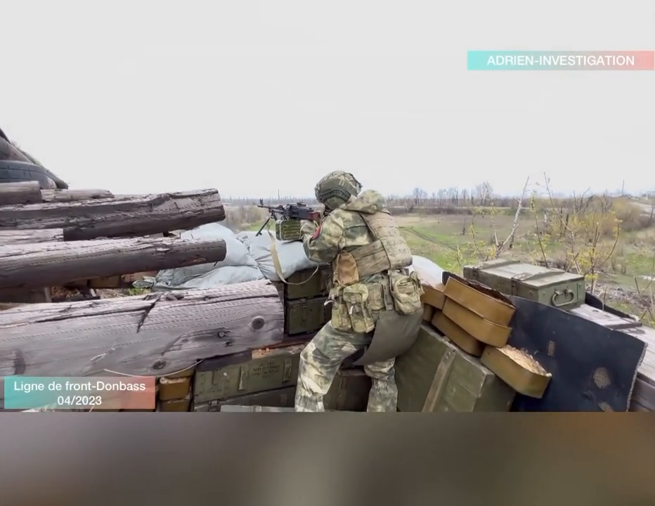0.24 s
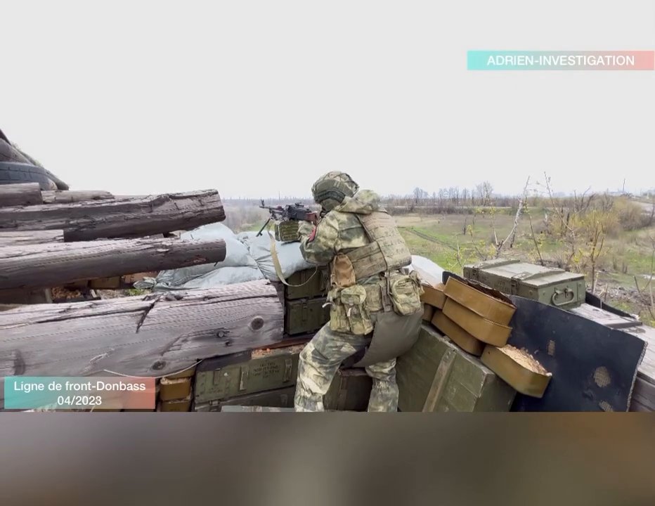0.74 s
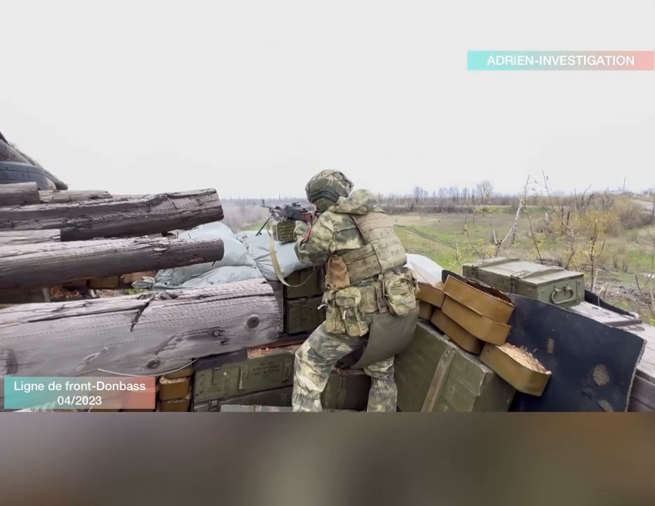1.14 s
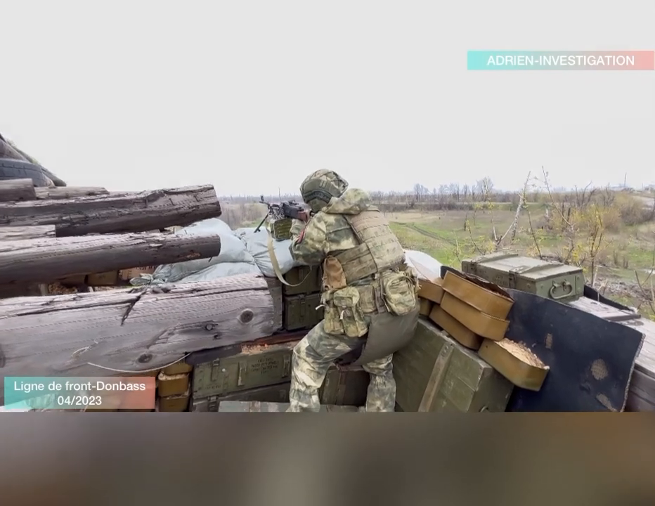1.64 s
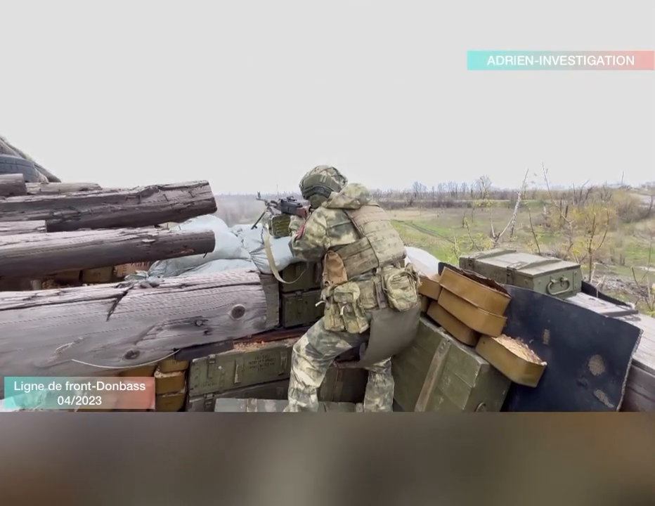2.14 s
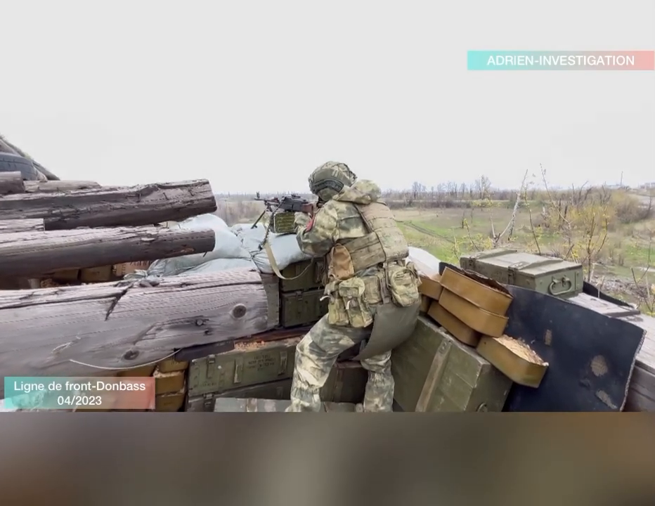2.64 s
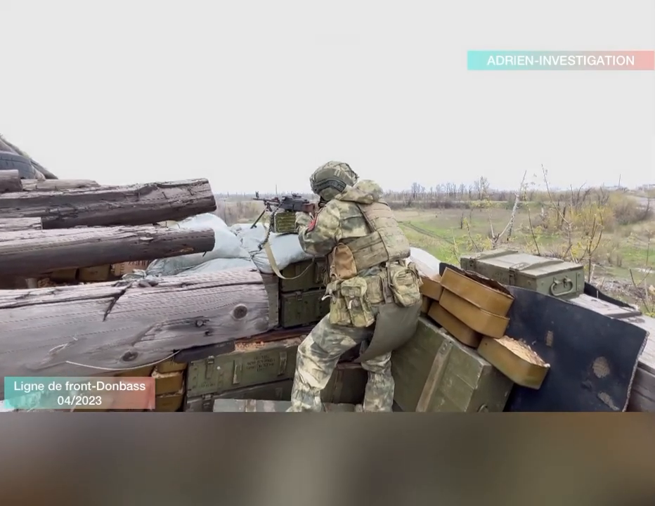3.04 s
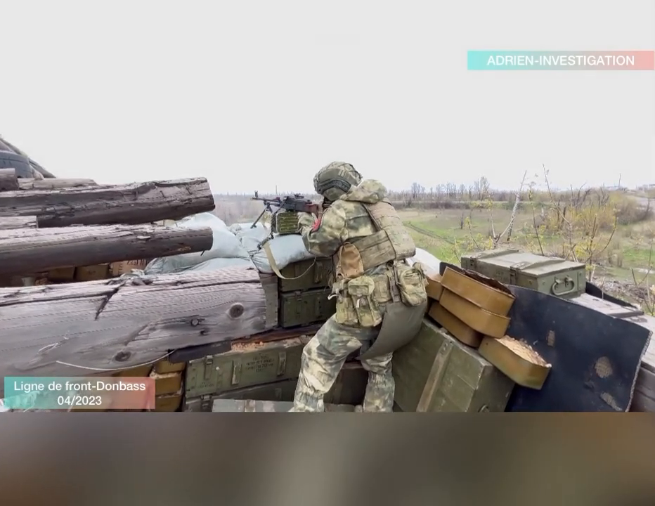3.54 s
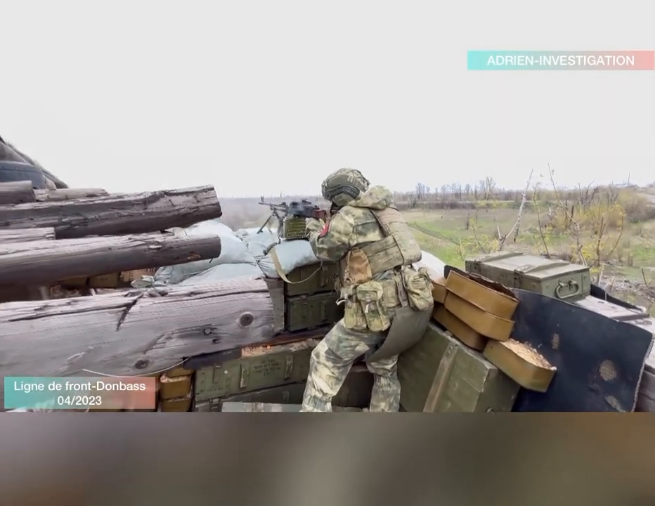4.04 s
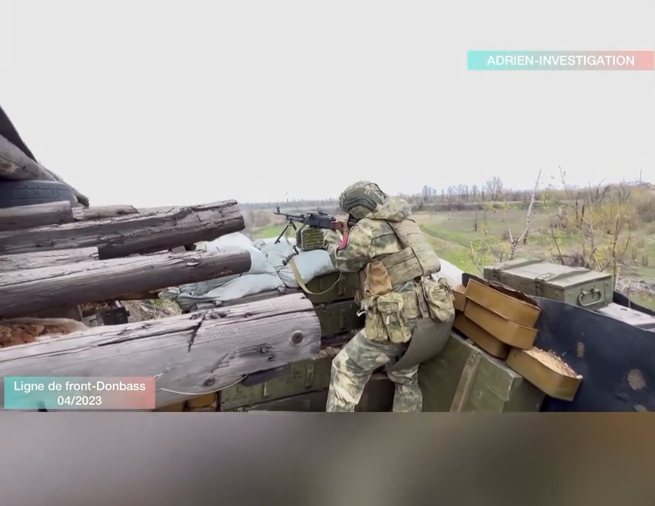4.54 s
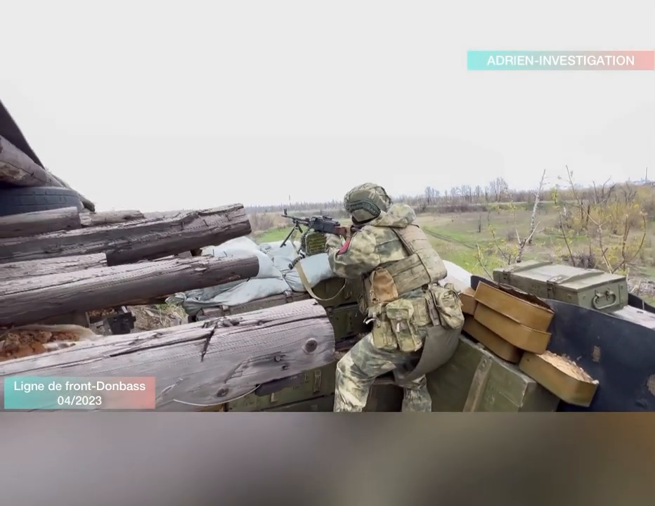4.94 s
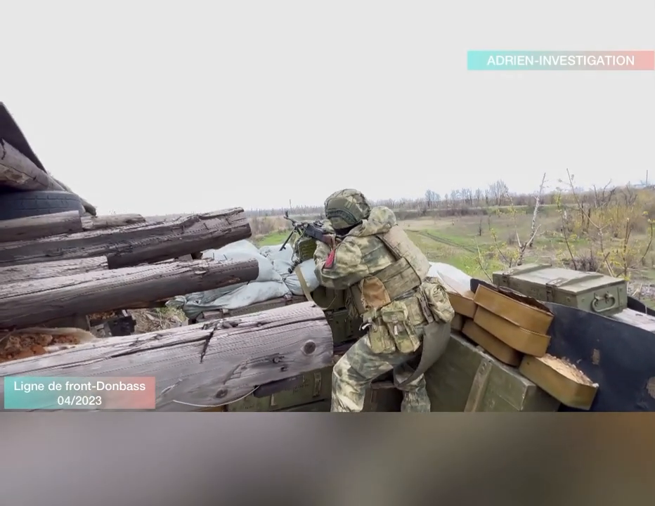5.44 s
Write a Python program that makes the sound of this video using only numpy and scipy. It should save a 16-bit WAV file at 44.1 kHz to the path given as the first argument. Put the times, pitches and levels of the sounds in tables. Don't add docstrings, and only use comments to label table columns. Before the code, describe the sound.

Close outdoor stereo capture of a belt-fed machine gun in a log-and-crate trench, weighted left. A faint tail from earlier fire, wind thumps and small pops open the scene, then bolt clicks and a brief scrape lead into three rounds at 0.3-0.5 s. Two follow at 1.0-1.1, three at 1.8-2.0, three at 3.15-3.3 after the longest pause, and three at 3.95-4.1. Rounds are roughly 0.08 s apart: a bright, dry gas crack, a woody midrange bark, a pressure blast with tight reflections, and a low wall thud. After each burst a metallic catch clicks about 0.07-0.1 s later; loose links tick, and the belt drags briefly near 2.2. Echo rolls over fields as a long hiss, with a faint ridge reply nearly a second later. Gusts and dull pops buffet the microphone, strongest around 2.5-3.1 and 3.55. From 4.3 to the end, echoes fade into soft wind, airy hiss and tiny ticks.

```python
import sys
import numpy as np
from scipy import signal
from scipy.fft import rfft, irfft, next_fast_len
from scipy.io import wavfile
from scipy.ndimage import uniform_filter1d

SR = 44100
rng = np.random.default_rng(int(sys.argv[2]) if len(sys.argv) > 2 else 0)


def level_to_linear(level):
    exponent = np.asarray(level, float) / 20
    return 10 ** exponent


def transcribe(signal):
    frames = np.atleast_2d(signal).T
    limited = np.clip(frames, -1, 1)
    pcm = np.round(limited * 32767).astype(np.int16)
    wavfile.write(sys.argv[1], SR, pcm)


N = 250487
LEAD_S = 0.014
SLOW_S = np.arange(0, N / SR + .002, .002)

# (time [s], crack peak [dB], blast above it [dB], bark above it [dB], left minus right [dB])
ROUNDS = [(0.3215, -11, -11, -12.5, 10.5), (0.4086, -11, -8.5, -8, 9.0), (0.4928, -11.5, -9, -8.5, 11),
          (1.005, -11, -9.5, -7.5, 11), (1.0902, -11, -10.5, -5.5, 7.5), (1.7942, -9.5, -11.5, -10.5, 10),
          (1.8784, -9.5, -11.5, -8, 9.5), (1.9601, -10.5, -11, -7.5, 10), (3.1461, -9, -12, -5, 9),
          (3.2277, -9.5, -10.5, -7, 8.5), (3.3132, -9.5, -10.5, -8, 9.5), (3.9545, -10.5, -11, -19, 11),
          (4.04, -9, -11.5, -3, 8), (4.1234, -10, -9.5, -10, 10)]
# (frequency [Hz], level [dB per Hz])
CRACK = [(1120, -29), (1900, -4), (2800, -8), (5180, -10), (5670, -10), (7580, -11), (8520, -5.5),
         (9940, -15), (11600, -23), (13900, -20), (15600, -36.5), (16500, -46)]
# (frequency [Hz], level [dB per Hz])
BARK = [(350, -36.5), (620, 3.5), (900, -16), (1100, 3.5), (1330, -14), (1600, -7), (1900, -14),
        (2200, -11), (2700, -13), (3500, -26.5)]
# (frequency [Hz], level [dB per Hz])
WASH = [(35, -37), (60, -2), (246, -3), (573, -11), (1470, -16), (1730, -11), (2460, -21.5), (8540, -24.5),
        (11300, -34), (14300, -27), (16500, -69)]


def rounds():
    out = np.zeros((2, N))
    trench = pair(6144, CRACK, 0.15), pair(6144, BARK, 0.96), pair(6144, WASH, 0.04)
    for time, db, blast_db, bark_db, pan_db in ROUNDS:
        add(out, shot(blast_db, bark_db, trench), time - LEAD_S, db, pan_db - 7.0)
    return out


# (frequency [Hz], left minus right [dB])
NEAR_PORT = [(60, 7), (110, 1.5), (200, -3), (380, 8.5), (700, 9), (1290, 0), (2380, 2), (4400, 8),
             (8120, 7.5), (15000, -3)]
# (delay [s], level [dB])
NEAR_ECHOES = [(.002, -6), (.0038, -2), (.007, -5), (.0082, -6), (.0115, -3), (.013, -5), (.0151, 0),
               (.0178, -5), (.0203, -8), (.0217, -4), (.0269, -6), (.0303, -6), (.0351, -13), (.0403, -14),
               (.0435, -13)]
# (delay [s], level [dB])
FAR_ECHOES = [(.0049, -13), (.0093, -8), (.0107, -10), (.013, -12), (.0156, -12), (.0169, -11),
              (.0185, -10), (.0213, -12), (.0237, -14), (.0294, -16), (.0356, -18), (.0445, -18)]


def shot(blast_db, bark_db, trench):
    t = np.arange(6144) / SR - LEAD_S
    spurts = flicker(len(t), 1500, 2.5)[0]
    crack = again(trench[0], CRACK, .6, fresh=.6)
    bark = again(trench[1], BARK, .5, fresh=.5)
    wash = again(trench[2], WASH, .3, fresh=.4)

    lead_in = level_to_linear(-21.0) * fade(t + 0.011, 0.003, .3)
    lead_in = lead_in + level_to_linear(-11.0) * level_to_linear(60 * np.minimum(t, 0) / 0.0052)
    lead_in = lead_in * (t < 0)
    burst = np.minimum(fade(t, 0.00017, 0.051), .7) * 1.34
    crack = crack * (spurts * burst + lead_in)
    bark = bark * np.minimum(fade(t - .0006, 0.0006, 0.064), .5)

    early_wash = level_to_linear(-3.5) * (t < 0) * fade(t + 0.0067, 0.012, 0.1)
    late_slap = 1.4 * fade(t - .021, 0.0063, 0.034)
    wash = wash * (fade(t, .013, 0.19) + late_slap + early_wash)

    gas = crack * level_to_linear(-5.5) + bark * level_to_linear(bark_db + 1.0) + wash * level_to_linear(-9.5)
    left_shade = [(hz, db / 2) for hz, db in NEAR_PORT]
    right_shade = [(hz, -db / 2) for hz, db in NEAR_PORT]
    gas = np.array([colour(gas[0], left_shade), colour(gas[1], right_shade)])

    near = blast(t, NEAR_ECHOES, .00004, 1.2)
    far = blast(t, FAR_ECHOES, .0002, 2.5) * level_to_linear(3)
    return gas + (np.array([near, far]) + hollows(t)) * level_to_linear(blast_db + 14.5)


def again(kept, spectrum, alike, fresh):
    return np.sqrt(1 - fresh ** 2) * kept + fresh * pair(kept.shape[1], spectrum, alike)


def blast(t, echoes, scatter_s, scatter_db):
    delay, db = np.transpose(echoes)
    chance = rng.standard_normal((2, len(delay)))
    width = (0.00018 + 0.0078 * delay)[:, None]
    arrival = (delay + scatter_s * chance[1])[:, None]
    dips = -level_to_linear(db + scatter_db * chance[0]) @ np.exp(-((t - arrival) / width) ** 2)
    leak = signal.butter(1, 260, "highpass", fs=SR, output="sos")
    return signal.sosfilt(leak, dips)


# (frequency [Hz], level [dB], time to fall 60 dB [s], right minus left [dB])
HOLLOWS = [(88, -21, 0.23, -2), (261, -14.5, 0.16, -5.5), (466, -15, 0.043, -3.5), (598, -9, 0.029, -5.5),
           (740.3, -10.5, 0.067, 0.5), (1059, -12.5, .05, -4.5), (1114, -15, 0.12, -4.5),
           (1645, -3.5, 0.027, -9), (1710, -11.5, .025, -9), (2260, -4, 0.015, -12.5)]


def hollows(t):
    hz, db, t60, far_db = np.transpose(HOLLOWS)[:, :, None]
    chance = rng.standard_normal((3, *hz.shape))
    db = db + 3 * chance[0]
    hz = hz * (1 + .025 * chance[1])
    ports = (0, .001), (far_db, 0.002814 + .0008 * chance[2])  # (level [dB], delay [s])
    out = []
    for port_db, late in ports:
        ring = fade(t - late, 2.1 / hz, t60) * np.sin(2 * np.pi * hz * (t - late))
        out.append(np.sum(level_to_linear(db + port_db) * ring, axis=0))
    return np.array(out)


# (first round time [s], force on the trigger [dB], bolt caught again [s], catch peak [dB],
# recoil into the wall [dB])
BURSTS = [
    (0.3205, 0, 0.5504, -36, -3),
    (1.005, .5, 1.1696, -35, 0),
    (1.7949, -1.5, 2.0305, -38, 2),
    (3.1462, 1.5, 3.3785, -38, 0),
    (3.9553, 5, 4.19, -30.5, 0),
]


def thuds():
    out, t = np.zeros((2, N)), np.arange(8192) / SR
    times, db = np.transpose(ROUNDS)[:2]
    first = np.diff(times, prepend=-1) > .5
    recoil_db = np.transpose(BURSTS)[4][np.cumsum(first) - 1]
    db = db + 4 * first + recoil_db
    chance = rng.standard_normal((len(times), 3))
    for time, level, (bend, jolt, turn) in zip(times, db, chance):
        phase = 2 * np.pi * 138 * (1 + .03 * bend) * t + np.array([[0], [turn]])
        thud = fade(t, 0.03, 0.085) * np.sin(phase)
        add(out, thud, time + 0.009, level + 2 * jolt, 6)
    return out


EARLIER_S = (-.5, -.41)
# (frequency [Hz], level [dB per Hz])
ROLL = [(120, -39.5), (200, -12), (306, -10.5), (728, -13), (1200, -16), (1500, -20.5), (3630, -28),
        (5970, -23.5), (7590, -29.5), (8330, -24), (10400, -31), (11400, -38), (14000, -35.5),
        (16500, -62.5)]
# (frequency [Hz], time to fall 60 dB [s])
ROLL_T60 = [(250, 2.1), (1000, 1.4), (2500, 2.54), (5000, 1.3), (9000, 1), (14000, 0.7)]


def roll(times, db):
    t = np.arange(3 * SR) / SR
    spectrum = rfft(pair(len(t), ROLL, -0.28, lag=0))
    hz = np.arange(len(t) // 2 + 1) / 3
    octave = np.log2(np.maximum(hz, 1))
    tail = 0
    for mid in 125 * 2. ** np.arange(8):
        share = np.maximum(1 - np.abs(octave - np.log2(mid)), 0)
        tail = tail + irfft(spectrum * share, len(t)) * fade(t, 0.015, along(ROLL_T60, mid))
    tail = tail * flicker(len(t), 34, 0.94)
    hits = np.zeros((1, N + SR))
    hits[0, ((times + 1) * SR).astype(int)] = level_to_linear(db)
    return signal.fftconvolve(hits, tail, axes=1)[:, SR:SR + N]


# (frequency [Hz], level [dB per Hz])
RIDGE = [(300, -29), (900, -5.5), (1400, -6), (2100, -6), (3500, -22.5), (5500, -26), (9000, -44.5)]


def ridge(times):
    power = sum(fade(SLOW_S - time - 0.83, 0.13, 1.9) ** 2 for time in times)
    return pair(N, RIDGE, 0.079) * gain(power) * level_to_linear(-60)


# (frequency [Hz], level [dB per Hz])
CLICK = [(470, -29.5), (800, -5.5), (1580, -4.5), (2470, -12.5), (5550, -7.5), (9570, -8.5), (11400, -15.5),
         (15300, -13), (16500, -26)]
# (frequency [Hz], level [dB per Hz])
FAINT_CLICK = [(1000, -27), (2500, -14), (5000, -9), (8800, -10), (10500, -16), (16000, -30)]
# (time [s], peak [dB])
LINKS = [(0.597, -41), (2.2678, -48), (2.3436, -54), (2.372, -49), (2.7489, -62), (3.0688, -41),
         (3.8793, -42), (4.61, -62.5), (4.8387, -67.5), (4.9394, -66.5), (5.1944, -70.5), (5.2944, -66),
         (5.4194, -68)]
# (start [s], end [s], level [dB])
BELT_DRAG = (2.15, 2.24, -59)


def action():
    out, t = np.zeros((2, N)), np.arange(4096) / SR
    # (lead [s], peak [dB], left minus right [dB], time to fall 60 dB [s])
    trigger, sear = (0.068, -43, 4, 0.035), (0.0533, -33.5, 3.5, 0.028)
    clicks, scrapes = [], [BELT_DRAG]
    for time, force_db, caught, catch_db, _ in BURSTS:
        for lead, db, pan_db, t60 in (trigger, sear):
            clicks.append((time - lead, db + force_db, pan_db, t60))
        clicks.append((caught, catch_db, 2, 0.028))
        scrapes.append((time - 0.088, time, -51 + 0.7 * force_db))
    clicks += [(time, db, 6, 0.031) for time, db in LINKS]

    for time, db, pan_db, t60 in clicks:
        tick = pair(len(t), CLICK if db > -45 else FAINT_CLICK, 0.2)
        tick = tick * fade(t, .0005, t60)
        add(out, tick, time + 0.00079, db - 3.0, pan_db)
    for start, end, db in scrapes:
        n = int((end - start) * SR)
        scrape = pair(4096, CLICK, .4) * flicker(4096, 250, 2.0)
        shape = np.linspace(.4, 1.3, n) * signal.windows.tukey(n, .3)
        add(out, scrape[:, :n] * shape, start, db, 2.5)
    return out


# (time [s], peak [dB], left minus right [dB])
POPS = [
    (0.075, -44, 6),
    (0.183, -42, 18),
    (2.526, -39, 0),
    (2.634, -51, 6),
    (2.688, -35.5, 7),
    (3.126, -33.5, 3),
    (3.827, -38, 5.5),
    (5.279, -48, 11),
    (5.58, -51, -3),
]
# (frequency [Hz], level [dB per Hz])
POP = [(120, -23.5), (300, 11), (700, -7.5), (1300, -11.5), (2200, -31.5), (4000, -86.5)]


def pops():
    out, t = np.zeros((2, N)), np.arange(4096) / SR
    for time, db, pan_db in POPS:
        pop = pair(len(t), POP, 0.1, lag=0) * fade(t, 0.00076, 0.1)
        add(out, pop, time, db, pan_db)
    return out


# (middle [s], length [s], rumble [dB], flutter above it [dB], left minus right [dB])
GUSTS = [(0.056, 0.072, -44, -10, 1), (0.192, 0.15, -47, -6.5, 3.5), (0.68, 0.16, -48.5, -11.5, 2),
         (0.85, 0.26, -54, -17.5, 4.5), (1.248, 0.21, -48, -11.5, 1), (1.4, 0.051, -56, -14.5, 10),
         (1.593, 0.073, -55.5, -8, -0.5), (2.11, 0.37, -43.5, -10, 1), (2.303, 0.058, -75, -23.5, 16),
         (2.477, 0.048, -42, -10.5, 1.5), (2.566, 0.077, -39.5, -31, 0), (2.68, 0.12, -42, -10, 5.5),
         (2.884, 0.13, -42.5, -13.5, -0.1), (3.466, 0.12, -48.5, -5.5, 0.5),
         (3.555, 0.11, -39.5, -9.5, 4.5), (3.85, 0.098, -48, -5.5, 5.5), (4.299, 0.15, -54, -5, 6),
         (4.535, 0.14, -52.5, -14.5, 13), (4.773, 0.073, -63.5, -8, 18), (4.94, 0.064, -60, -24, 3),
         (5.051, .06, -67, -3, 5), (5.18, 0.14, -50.5, -12, 3), (5.293, .08, -54, -8.5, 3),
         (5.614, 0.12, -52, -7, -1)]
# (frequency [Hz], level [dB per Hz])
GUST = [(12, -42.5), (20, -11), (44, 8.5), (86, 5), (315, -2.5), (400, -19), (520, -44), (880, -120)]
# (frequency [Hz], level [dB per Hz])
AIR = [(59, -30.5), (100, -6.5), (381, -11.5), (676, -21), (1870, -16.5), (3700, -35), (7610, -42.5),
       (9020, -40), (16000, -65)]


def wind():
    lull_db, lull_flutter_db = -62, -11.5
    air_db, air_pan_db = -74, -1.5
    hum_db, hum_t60_s = -68, 11
    ports = np.array([[1], [-1]]) / 2

    low, high = level_to_linear(2 * lull_db), level_to_linear(2 * (lull_db + lull_flutter_db))
    for middle, length, db, up_db, pan_db in GUSTS:
        shape = swell(middle, length)
        low = low + shape * level_to_linear(2 * (db + ports * pan_db))
        high = high + shape * level_to_linear(2 * (db + up_db + ports * pan_db))
    far = level_to_linear(2 * air_db)
    for time in np.r_[EARLIER_S, np.transpose(ROUNDS)[0]]:
        far = far + level_to_linear(2 * hum_db) * fade(SLOW_S - time, .05, hum_t60_s) ** 2

    rumble = pair(N, GUST, -.4, lag=0) * flicker(N, 90, 3.0)
    rumble = rumble / np.sqrt(uniform_filter1d(rumble ** 2, size=2600) + 0.07)
    flutter_tone = [(250, -31), (400, 6.5), (1000, -13.0), (2500, -40.5)]
    flutter = unit(pair(N, flutter_tone, -0.66, lag=0) * flicker(N, 40, 11.0))
    flutter = flutter / np.sqrt(uniform_filter1d(flutter ** 2, size=2000) + .05)
    gusts = rumble * gain(low) * level_to_linear(5.5) + flutter * gain(high) * level_to_linear(7.0)
    gusts = signal.sosfilt(signal.butter(4, 2500, fs=SR, output="sos"), gusts)

    hiss = pair(N, AIR, -0.053, lag=0) * flicker(N, 25, 3.5)
    return gusts + hiss * gain(far) * level_to_linear(ports * air_pan_db)


def swell(middle, length):
    return np.exp(-(2 * (SLOW_S - middle) / length) ** 2)


def gain(power):
    t = np.arange(N) / SR
    return np.array([np.interp(t, SLOW_S, np.sqrt(p)) for p in np.atleast_2d(power)])


def along(table, hz):
    f, v = np.transpose(table)
    return np.interp(np.log(np.maximum(hz, 1)), np.log(np.maximum(f, 1)), v)


def colour(x, spectrum):
    n = next_fast_len(x.shape[-1])
    hz = np.arange(n // 2 + 1) * SR / n
    return irfft(rfft(x, n) * level_to_linear(along(spectrum, hz)), n)[..., :x.shape[-1]]


def unit(x):
    return x / np.sqrt(np.mean(x ** 2))


def pair(n, spectrum, alike, lag=26):
    near, other = rng.standard_normal((2, n))
    far = alike * np.roll(near, lag) + np.sqrt(1 - alike ** 2) * other
    return unit(colour(np.array([near, far]), spectrum))


def flicker(n, rate, spread_db):
    k = max(int(SR / rate), 1)
    drift = uniform_filter1d(rng.standard_normal((2, n)), k)
    return level_to_linear(spread_db * unit(uniform_filter1d(drift, k)))


def fade(t, rise, t60):
    t = np.maximum(t, 0)
    return (1 - np.exp(-t / rise)) * level_to_linear(-60 * t / t60)


def add(out, x, time, db, pan_db):
    i = int(time * SR)
    n = min(x.shape[1], N - i)
    out[:, i:i + n] += x[:, :n] * level_to_linear(db + np.array([[pan_db], [-pan_db]]) / 2)


def scene():
    times, db = np.transpose(ROUNDS)[:2]
    times = np.r_[EARLIER_S, times]
    echoes = thuds() + roll(times, np.r_[-14, -14, db] - 33.5) + ridge(times)
    return rounds() + echoes + action() + pops() + wind()


# (low edge [Hz], high edge [Hz], least share of the whole [dB], least level [dB])
DROPS = [(10200, 11000, -36, -97), (11000, 11900, -31, -95), (11900, 12600, -49, -101),
         (12600, 13400, -57, -103), (13400, 14300, -56, -103), (14300, 15300, -54, -101),
         (15300, 16800, -44, -94)]


def starve(x):
    hz, _, frames = signal.stft(x, SR, nperseg=1024)
    power = np.mean(np.abs(frames) ** 2, axis=0) + 1e-18
    whole_db = 10 * np.log10(power.sum(axis=0))
    for low, high, share_db, least_db in DROPS:
        band = (hz >= low) & (hz < high)
        db = 10 * np.log10(power[band].sum(axis=0)) + 2.5 * rng.standard_normal(len(whole_db))
        frames[:, band] *= (db - whole_db > share_db) & (db > least_db)
    return signal.istft(frames, SR, nperseg=1024)[1][:, :N]


def low_pass(x):
    return signal.sosfilt(signal.butter(12, 16640, fs=SR, output="sos"), x)


# (middle [Hz], width [Hz], level [dB])
GAPS = [(5240, 120, -19.5), (7710, 240, -16), (10550, 1200, -1)]


def record(dry):
    mono_hz, top_hz = 10600, 15600
    n = next_fast_len(N)
    hz = np.arange(n // 2 + 1) * SR / n
    spectrum = rfft(np.tanh(dry * 1.077) / 0.98, n)
    top = np.clip((hz - mono_hz) / 600, 0, 1)
    spectrum = spectrum * (1 - 0.46 * top) + top * np.array([[.1], [.55]]) * spectrum[0]
    gaps_db = sum(db * np.exp(-((hz - mid) / width * 2) ** 2) for mid, width, db in GAPS)
    top_cut_db = -40 * np.clip((hz - top_hz) / 700, 0, 1)
    bass_cut = hz ** 2 / (hz ** 2 + 35 ** 2)
    spectrum *= level_to_linear(gaps_db + top_cut_db) * bass_cut
    return low_pass(starve(irfft(spectrum, n)[:, :N]))


dry = scene()
out = record(dry)
transcribe(out)
```